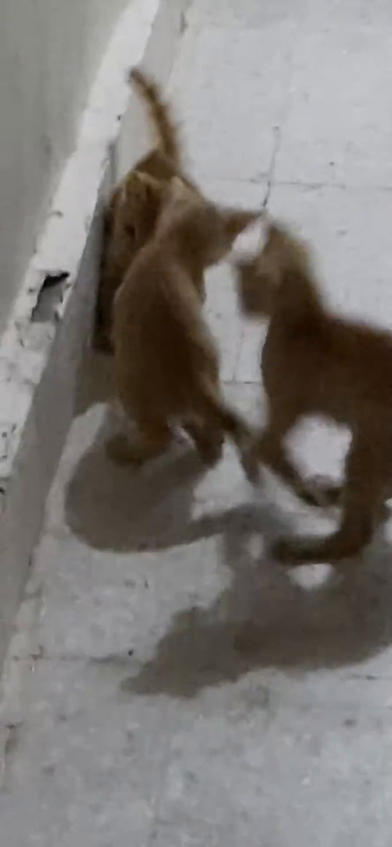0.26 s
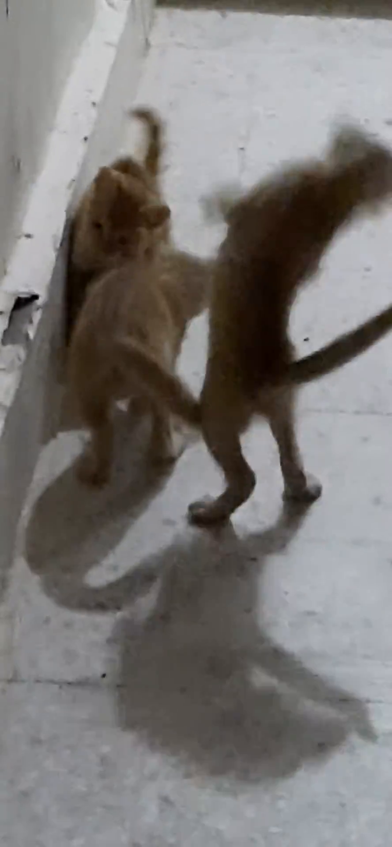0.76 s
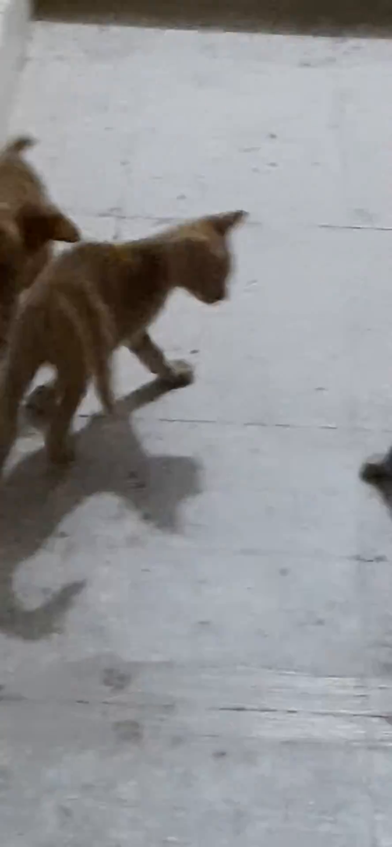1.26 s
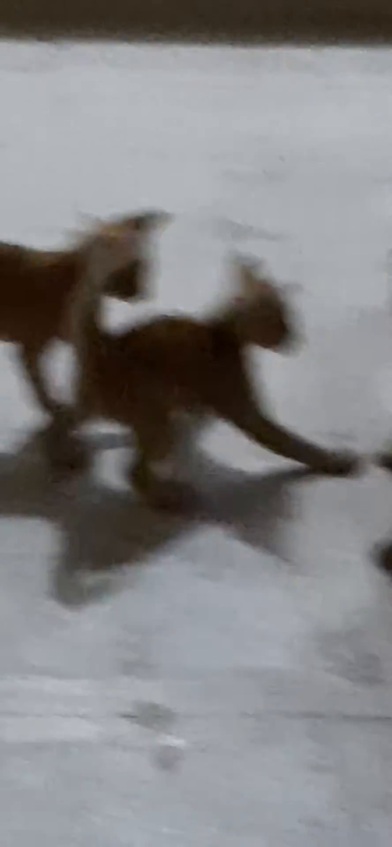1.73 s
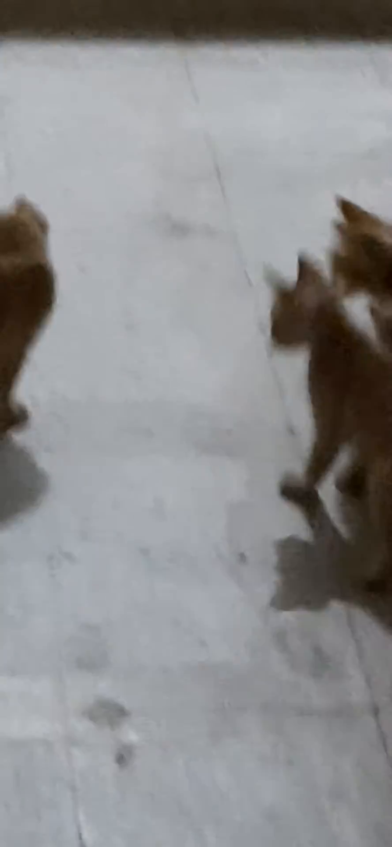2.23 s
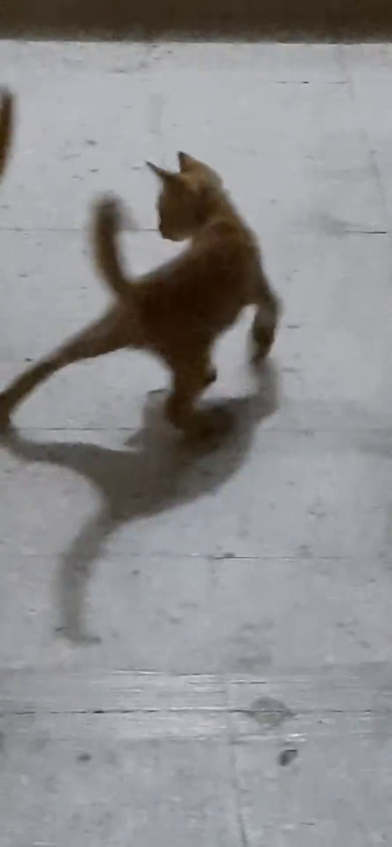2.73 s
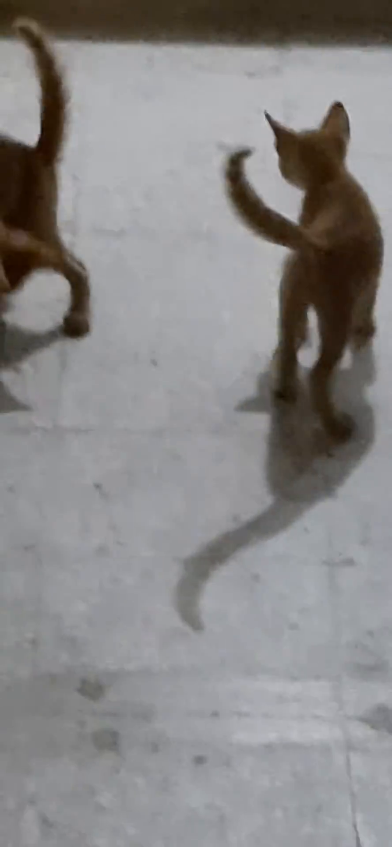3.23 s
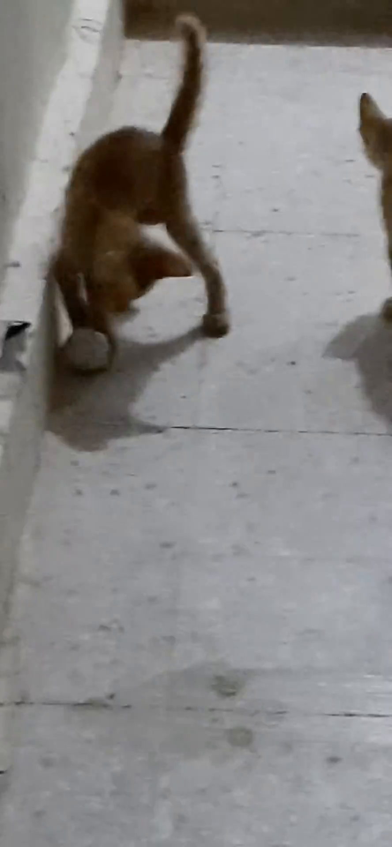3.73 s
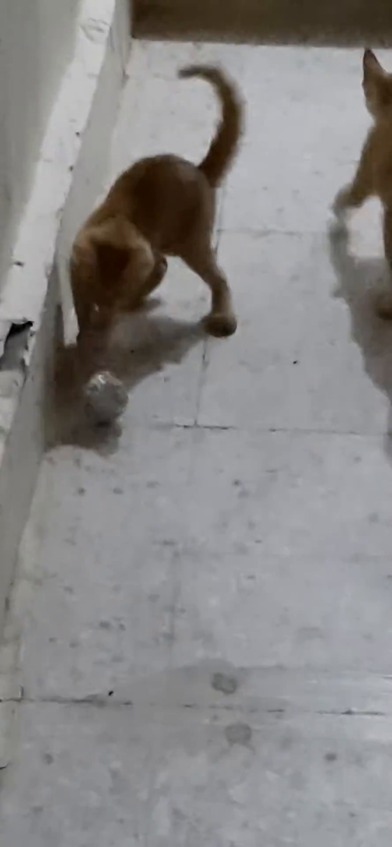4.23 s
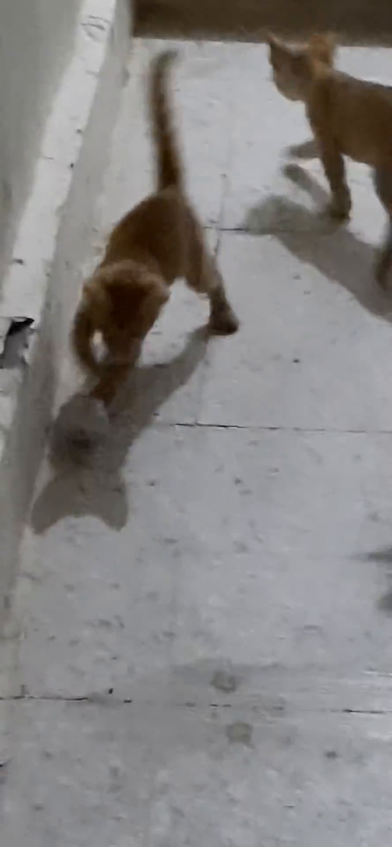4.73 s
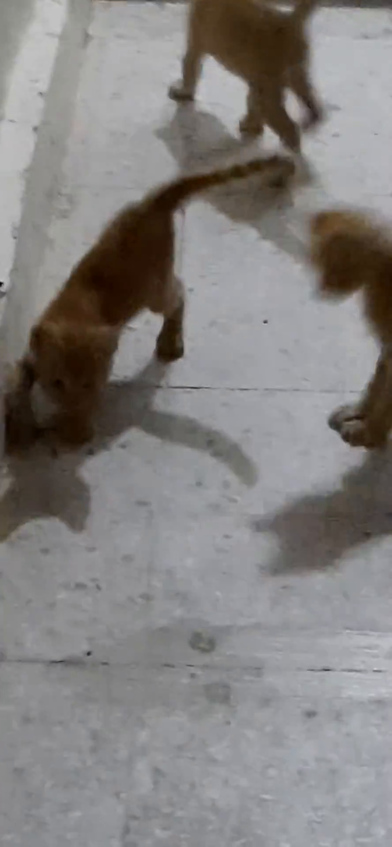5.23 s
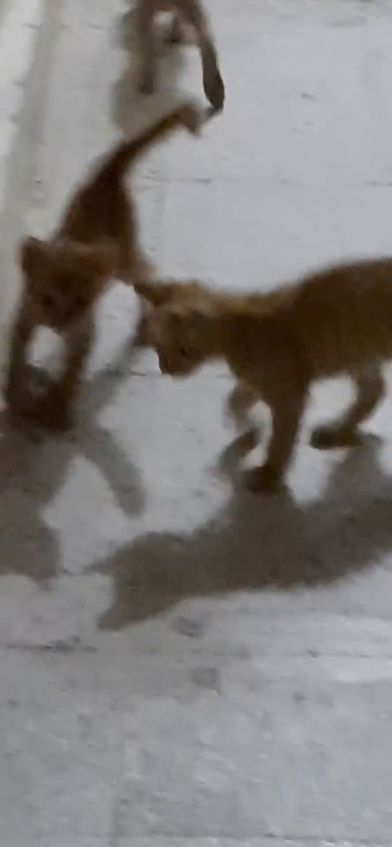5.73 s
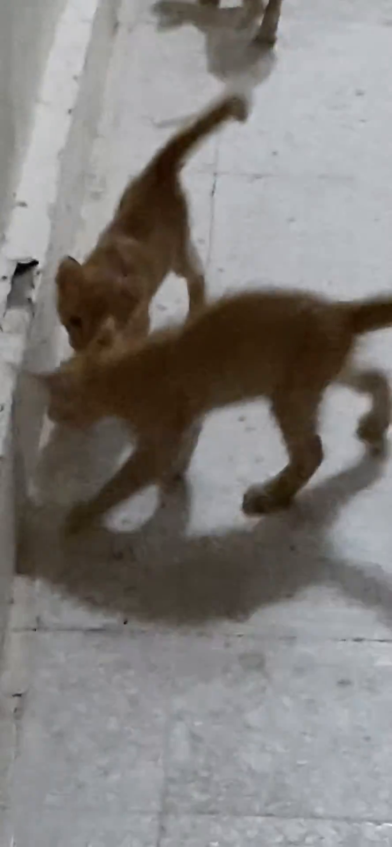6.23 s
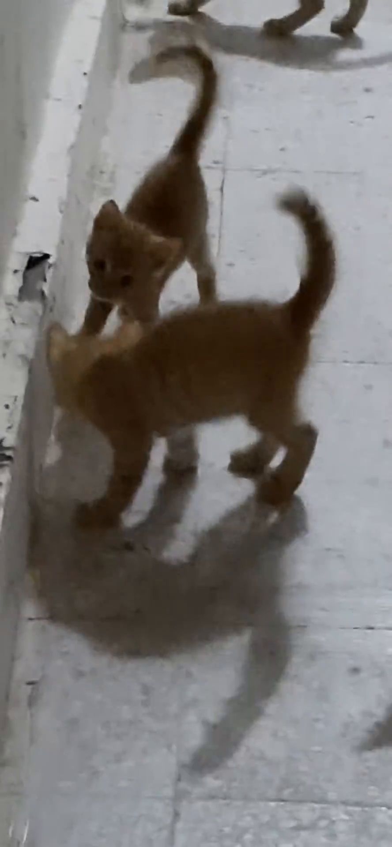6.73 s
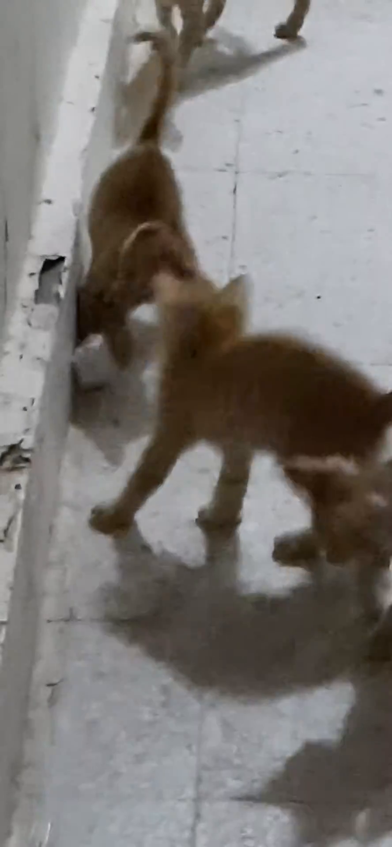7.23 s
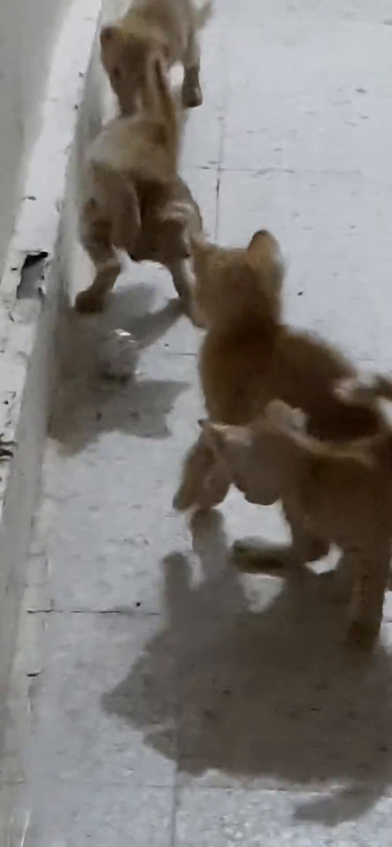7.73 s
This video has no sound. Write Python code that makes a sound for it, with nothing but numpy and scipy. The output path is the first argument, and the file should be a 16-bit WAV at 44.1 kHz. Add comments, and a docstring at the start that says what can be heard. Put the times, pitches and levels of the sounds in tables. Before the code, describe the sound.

Kittens scuffle on a hard tiled floor, claws scratching and a crumpled foil ball ticking and crinkling, over an uneven low hum and airy rush.

```python
"""A low hum throbs unevenly over rumble, drone and a steady rush of air, all shaped from random noise.
Kittens scuffle on a tiled floor: paws and claws skid in grainy strokes of tiny slips and ringing snaps.
A crumpled foil ball ticks, knocks and crinkles along the foot of a wall, built from pushes into resonances.
Smacks, drops and landings ring out as decaying sines; the hard room answers with a short noise tail."""
import sys
import numpy as np
from scipy import signal
from scipy.fft import rfft, irfft, next_fast_len
from scipy.io import wavfile
from scipy.ndimage import map_coordinates

SR = 44100
rng = np.random.default_rng(int(sys.argv[2]) if len(sys.argv) > 2 else 0)


def wav_out(sig):
    """Save sig, one row per channel (or a flat mono array), as 16-bit PCM at SR to the path in sys.argv[1]."""
    wavfile.write(sys.argv[1], SR, np.round(np.clip(np.atleast_2d(sig).T, -1, 1) * 32767).astype(np.int16))


N = 351918  # samples


def amp(db):
    """Decibels to gain."""
    return 10 ** (np.asarray(db) / 20)


def unit(x):
    """x at rms 1."""
    return x / np.sqrt(np.mean(x ** 2) + 1e-20)


def along(points, hz):
    """(f/Hz, value) points read on a log frequency axis."""
    f, value = np.transpose(points)
    return np.interp(np.log(hz + 1), np.log(f + 1), value)


def gains(rows):
    """One gain per sample for each dB column after the time."""
    s, *columns = np.transpose(rows)
    t = np.arange(N) / SR
    return [amp(np.interp(t, s, column)) for column in columns]


def filtered(x, response):
    """x times a response of frequency."""
    n = x.shape[-1]
    padded = next_fast_len(n + 8192)
    spectrum = rfft(x, padded) * response(np.fft.rfftfreq(padded, 1 / SR))
    return irfft(spectrum, padded)[..., :n]


def resonance(hz, centre, width):
    """Causal response of one mode, with gain 1 at its centre."""
    return 1j * hz * width / (centre ** 2 - hz ** 2 + 1j * hz * width)


# left-right likeness of diffuse sound, clipped to -1..1: (f/Hz, correlation)
LIKENESS = [(120, 1.3), (200, 1.16), (380, 0.46), (700, 0.63), (1290, -0.031), (2300, 0.18), (4400, -0.13),
            (10000, .05)]


def spread(pair, spectrum):
    """Two unrelated signals, coloured and mixed to stereo of rms 1: alike in the bass, apart in the treble."""
    def response(hz):
        turn = np.arccos(np.clip(along(LIKENESS, hz), -1, 1)) / 2
        return amp(along(spectrum, hz)) * [np.cos(turn), np.sin(turn)]

    mid, side = filtered(pair, response)
    return unit(np.array([mid + side, mid - side]))


def drifting(n, depth_db, per_s):
    """A smooth random gain of n samples, with per_s random knots a second."""
    knots = np.arange(n) * per_s / SR
    return amp(depth_db * map_coordinates(rng.standard_normal(256), [knots], mode="wrap"))


# uneven swell of the hum, before it is smoothed and given its overall gain: (t/s, level/dB)
HUM_SWELL = [(0.0, -17.5), (0.13, -39.5), (0.15, -25), (0.49, -23.5), (0.56, -39), (0.89, -24.5),
             (1.38, -30.5), (1.44, -23), (1.55, -26.5), (1.6, -43), (1.64, -27), (1.82, -33), (1.86, -23.5),
             (1.91, -41), (1.95, -28), (2.13, -19), (2.45, -29.5), (2.49, -23), (2.89, -25.5),
             (2.91, -34.5), (2.98, -27), (3.11, -38), (3.15, -25), (3.62, -33), (3.65, -26.5), (3.78, -38),
             (3.87, -19), (3.91, -40.5), (3.98, -24.5), (4.16, -35.5), (4.25, -18.5), (4.33, -38),
             (4.44, -23.5), (4.53, -32), (4.58, -21.5), (4.82, -25.5), (4.87, -36), (5.0, -23),
             (5.13, -36.5), (5.31, -26.5), (5.64, -27.5), (5.78, -22.5), (5.84, -38), (5.91, -21),
             (5.96, -50.5), (6.0, -27.5), (6.2, -24.5), (6.27, -32), (6.31, -21.5), (6.47, -27.5),
             (6.49, -37), (6.84, -20.5), (6.93, -29.5), (7.36, -22.5), (7.44, -32), (7.49, -24),
             (7.62, -20.5), (7.67, -28.5), (7.76, -21), (7.98, -30)]
# weak steady tones beside the hum: (f/Hz, level/dB rms at the source)
STEADY_TONES = [(48.8, -53.5), (66, -52), (85, -51), (156, -48.5), (193.5, -53)]
HUM_DB, HUM_STEADY = 1, 0.6  # gain on the swell; evenness of the beating (0 = free, 1 = flat)


def hum():
    """A narrow low resonance, driven at random, throbs by its own beating; faint steady tones lie beside it."""
    mode = lambda hz: resonance(hz, 120.78, 5.33) * resonance(hz, 125.4, 34)
    wave = signal.hilbert(filtered(rng.standard_normal(N), mode))
    beating = np.abs(wave)
    even = unit(wave.real / (HUM_STEADY * beating + (1 - HUM_STEADY) * beating.mean()))
    # a low resonance cannot change its level abruptly
    smooth = lambda hz: np.abs(resonance(hz, 116.7, 53)) ** 2
    throb = filtered(gains(HUM_SWELL)[0] * even, smooth)
    t = np.arange(N) / SR
    tones = 0
    for hz, db in STEADY_TONES:
        tones = tones + amp(db) * np.sqrt(2) * np.sin(2 * np.pi * (hz * t + rng.random()))
    return amp(HUM_DB) * throb + tones


def rush(spectrum):
    """Stereo noise that falls away outside its spectrum."""
    below, above = (spectrum[0][0] / 2, -120), (spectrum[-1][0] * 2, -120)
    return spread(rng.standard_normal((2, N)), [below, *spectrum, above])


# colours of the four background layers, each relative within itself: (f/Hz, level/dB per Hz)
RUMBLE_COLOUR = [(20, -31.5), (30, -26), (45, -4), (60, -2), (75, -14), (95, 9), (112, 6.5), (140, 1.5),
                 (158, 3), (185, -9), (230, -20.5)]
DRONE_COLOUR = [(140, -18.5), (185, -4.5), (215, -3.5), (245, 1), (266, -3.5), (281, 6), (298, -9.5),
                (350, -12), (450, -38.5)]
AIR_COLOUR = [(150, -1.5), (350, 1.5), (440, 4), (530, -1), (620, 0.5), (720, -2.5), (900, 0), (1060, -8.5),
              (1550, -9), (2100, -10.5), (2750, -25), (3300, -24), (4500, -30.5), (7500, -29), (15000, -32)]
WHISTLE_COLOUR = [(1150, -16.5), (1310, -7.5), (1390, 2), (1470, -6.5), (1700, -26.5)]
# slow level changes, before the drift: (t/s, rumble level/dB, drone level/dB, whistling band level/dB)
BACKGROUND_LEVELS = [(0, -35, -43.5, -51), (1.5, -34, -39.5, -55), (2.3, -38, -42.5, -57.5),
                     (3.2, -35.5, -41, -55.5), (4.7, -34.5, -40, -57.5), (6.7, -35.5, -37, -55.5),
                     (7.98, -37.5, -38.5, -55.5)]
AIR_DB = -45.5  # the rush of air, before its drift
WANDER_DB, WANDER_PER_S = 0.9, 4.2  # depth and knot rate of each layer's own drift


def air():
    """Shaped noise: rumble, a hollow drone above the hum, and soft air with one faintly whistling band."""
    rumble, drone, whistle = gains(BACKGROUND_LEVELS)
    layers = [(rumble, RUMBLE_COLOUR), (drone, DRONE_COLOUR),
              (amp(AIR_DB), AIR_COLOUR), (whistle, WHISTLE_COLOUR)]
    return sum(level * drifting(N, WANDER_DB, WANDER_PER_S) * rush(colour) for level, colour in layers)


# colour of paws and foil rubbing on tile, relative: (f/Hz, level/dB per Hz)
FRICTION_COLOUR = [(300, -15), (700, -13.5), (1200, 7.5), (2100, 8), (3000, 0), (4200, -3), (5600, -4.5),
                   (7200, -5), (10000, 0), (15000, -11)]


def grains(n, per_s, scatter_db, life):
    """Tiny slips at random moments, each a short burst; most are weak and a few stand out."""
    size_db = scatter_db * np.minimum(rng.exponential(size=n), 4)
    energy = (rng.random(n) < per_s / SR) * amp(size_db) ** 2
    fading = signal.lfilter([1], [1, -np.exp(-1 / (life * SR))], energy)
    return spread(np.sqrt(fading) * rng.standard_normal((2, n)), [(80, -60), *FRICTION_COLOUR])


def crinkles(n, per_s, life):
    """Creases snap at random moments, each ringing briefly at its own pitch."""
    t = np.arange(SR // 80) / SR
    pair = np.zeros((2, n + len(t)))
    for when, pitch, size, *phases in rng.random((int(n * per_s / SR) + 1, 5)):
        hz = 1700 * 7 ** pitch  # 1.7 to 11.9 kHz before colouring
        turns = hz * t + np.array(phases)[:, None]
        ring = np.sin(2 * np.pi * turns) * np.exp(-t / life)
        pair[:, int(when * n):][:, :len(t)] += np.sqrt(hz) * amp(10 * size) * ring
    return spread(pair[:, :n], [(80, -60), *FRICTION_COLOUR])


RISE_DB, FADE_DB_PER_S, FADE_S = 11, 276.5, .18  # swell into the hold, fade rate, fade length


def stroke(rise, hold):
    """Envelope of one skid: it swells as the paw bears down, holds, and fades as the sliding stops."""
    t = np.arange(round((rise + hold + FADE_S) * SR)) / SR
    swell_db = -RISE_DB * np.maximum(1 - t / rise, 0)
    fade_db = -FADE_DB_PER_S * np.maximum(t - rise - hold, 0)
    return amp(swell_db + fade_db)


JUDDER_DB, JUDDER_PER_S = 2, 160  # depth and knot rate


def judder(n):
    """The quick, uneven gain of a paw that sticks and slips."""
    return unit(drifting(n, JUDDER_DB, JUDDER_PER_S))


# light shuffling between the skids, before a 4 dB lift: (t/s, level/dB)
SHUFFLE_LEVEL = [(0, -67), (.65, -73.5), (1.6, -65.5), (2.45, -71), (2.75, -65), (3.05, -74), (3.6, -65.5),
                 (4.3, -69), (4.9, -62), (5.2, -80), (6.8, -76), (7.05, -63), (7.55, -66.5), (7.76, -60.5),
                 (7.88, -70.5)]
# strokes of paws and foil on the tiles; friction level is before the ring and tilt:
# (start t/s, rise t/s, hold t/s, friction level/dB, ring f/Hz, ring level/dB, tilt/dB per octave)
SKID_STROKES = [(0.116, .006, 0.0036, -54, 2100, 1, 5.5), (0.301, 0.037, .045, -54, 1510, -1, -2),
                (0.384, .008, 0.0033, -52, 4460, 4.5, -1), (0.667, 0.013, 0.0055, -62.5, 6900, 8, 3),
                (1.249, 0.018, .003, -58, 2920, 9.5, -5), (1.324, .006, .012, -57.5, 2900, 6.5, -3),
                (1.416, 0.025, .012, -61.5, 7270, 4, 6), (1.59, .025, .012, -62.5, 4500, 5, -4.5),
                (1.755, .026, 0.043, -46, 2260, 1, -0.5), (1.847, .015, 0.039, -55, 2100, 1, -4.5),
                (2.078, .062, 0.0074, -48.5, 6970, -0.5, 0.5), (2.775, 0.024, .012, -50.5, 2800, 3.5, -2),
                (2.885, .012, .018, -46, 4230, 6.5, 3), (3.12, .012, 0.023, -52, 2070, 11, 3),
                (3.154, 0.04, .05, -49.5, 2170, 8.5, 4.5), (3.261, .005, 0.02, -51.5, 4360, 9, 2.5),
                (3.311, .018, 0.012, -59, 3030, 2, -1.5), (3.724, 0.025, 0.008, -50.5, 2700, 6, -2.5),
                (3.954, 0.027, 0.006, -53.5, 2000, 6, -1.5), (4.024, 0.022, .004, -59.5, 1970, 7, -2),
                (4.167, 0.024, 0.023, -62, 2000, 13, -2.5), (5.417, .004, 0.013, -48.5, 3730, 9, 3.5),
                (5.454, 0.0037, .006, -53.5, 3000, 10.5, -4), (5.613, 0.031, .014, -52, 5030, 2.5, 3.5),
                (7.03, .008, 0.0026, -59.5, 7400, 15, 0.5), (7.407, .008, 0.024, -51, 2520, 6.5, -3),
                (7.463, .03, 0.075, -59, 2200, 2, 3), (7.889, 0.014, 0.085, -50.5, 4500, 1, -1.5)]


def skids():
    """Claws and foil catch in dense slips and ringing snaps, each stroke with its own ring; faint shuffling."""
    out = amp(4.0) * gains(SHUFFLE_LEVEL)[0] * grains(N, per_s=900, scatter_db=3, life=0.0028)
    for s, rise, hold, db, ring_hz, ring_db, tilt_db in SKID_STROKES:
        first = round(s * SR)
        pressure = stroke(rise, hold)[:N - first]
        n = len(pressure)
        ring = lambda hz: 1 + (amp(ring_db) - 1) * resonance(hz, ring_hz, 0.18 * ring_hz)
        tilt = lambda hz: amp(tilt_db * np.log2((hz + 500) / 5000))
        slips = grains(n, per_s=1400, scatter_db=1.9, life=0.0009)
        snaps = amp(-6) * crinkles(n, per_s=800, life=.0012)
        scrape = filtered(slips + snaps, lambda hz: ring(hz) * tilt(hz))
        out[:, first:first + n] += amp(db) * pressure * judder(n) * scrape
    return out


# decay of the room's answer: (f/Hz, t60/s)
WALL_DECAY = [(200, 0.19), (2000, 0.079), (7000, 0.13), (15000, 0.19)]


def walls(x):
    """Bare walls and tiles answer with a short noise tail, 5 ms late, decaying at its own rate per frequency."""
    hz, t, z = signal.stft(rng.standard_normal((2, SR // 2)), SR, nperseg=256)
    decay = amp(-60 * t / along(WALL_DECAY, hz)[:, None])
    tail = signal.istft(z * decay, SR, nperseg=256)[1]
    tail = np.pad(tail / np.linalg.norm(tail[0]), ((0, 0), (SR // 200, 0)))
    return signal.fftconvolve(x, tail, axes=1)[:, :N]


# brief narrow noises, mostly rubs of ball or paw; the low one at 0.39 s is a faint tone of unknown source.
# Level is before the swell: (middle t/s, length t/s, f/Hz, width f/Hz, level/dB)
NARROW_NOISES = [(0.39, .13, 424, 119, -45), (1.78, .025, 2100, 380, -47), (1.805, 0.023, 2200, 450, -43.5),
                 (1.79, .03, 4200, 500, -52.5), (2.913, 0.046, 4240, 600, -51.5),
                 (3.281, .05, 2700, 700, -52.5), (6.915, 0.052, 1780, 300, -50.5),
                 (7.171, 0.047, 1820, 380, -44.5)]


def narrow_noises():
    """Brief noises, mostly rubs of ball or paw, swell and fade, each in one narrow resonance."""
    out = np.zeros((2, N))
    for s, length, ring_hz, width_hz, db in NARROW_NOISES:
        swell = np.hanning(round(length * SR))
        mode = lambda hz: resonance(hz, ring_hz, width_hz) ** 2
        noise = filtered(rng.standard_normal(len(swell)), mode)
        out[:, round((s - length / 2) * SR):][:, :len(swell)] += amp(db) * swell * unit(noise)
    return out


def burst(t, t60):
    """Noise of one contact dying away, mostly shared by left and right."""
    noise = rng.standard_normal(len(t)) + .5 * rng.standard_normal((2, len(t)))
    return noise * amp(-60 * t / t60)


# claws click sharply on the tile: (t/s, level/dB rms over a sixteenth of a second)
CLAW_CLICKS = [(0.393, -59), (1.268, -62), (1.635, -70.5), (1.78, -57.5), (2.147, -62.5), (4.641, -61),
               (4.722, -70), (4.902, -69.5), (5.419, -61.5), (5.425, -61.5), (5.435, -62), (7.174, -65.5),
               (7.431, -60.5), (7.909, -64.5)]
CLICK_HZ, CLICK_WIDTH_HZ, CLICK_T60_S = 8000, 19000, 0.011


def clicks():
    """A claw tip strikes the hard floor: a very short, bright crack with no body."""
    t = np.arange(SR // 16) / SR
    out = np.zeros((2, N))
    bright = lambda hz: resonance(hz, CLICK_HZ, CLICK_WIDTH_HZ) ** 2
    for s, db in CLAW_CLICKS:
        crack = filtered(burst(t, t60=CLICK_T60_S), bright)
        out[:, round(s * SR):][:, :len(t)] += amp(db) * unit(crack)
    return out


def strike(t, rattle_db, t60):
    """One sharp push together with a brief rattle of the foil's creases."""
    rattle = burst(t, t60)
    return (t == 0) + amp(rattle_db) * rattle / np.linalg.norm(rattle[0])


# the crumpled ball's hollow resonances, before each contact's pitch factor: (f/Hz, width f/Hz, level/dB)
BALL_MODES = [(1740, 380, 6), (2280, 460, 1.5), (3650, 470, -10)]
# contacts of the ball and of claws, levels before the trims in taps():
# (t/s, floor knock f/Hz, knock level/dB, ball pitch factor, hollow body level/dB, crack level/dB)
CONTACTS = [(1.156, 513, -49, 0.9, -44.5, -56.5), (1.334, 510, -45.5, 0.84, -50.5, -57.5),
            (1.792, 704, -48, 1, -45, -55.5), (1.8, 527, -45, 0.95, -44.5, -49.5),
            (1.813, 700, -48.5, 1.2, -49.5, -52.5), (1.828, 780, -44, 1.1, -50.5, -53.5),
            (1.836, 700, -47.5, 0.77, -51, -58.5), (2.373, 830, -54.5, 0.77, -53.5, -66),
            (2.656, 875, -52.5, 0.97, -46, -66.5), (3.214, 1310, -49, 1.1, -48, -64.5),
            (3.247, 1300, -64, 0.97, -43, -62.5), (3.265, 1300, -63, 1.2, -46.5, -59),
            (3.383, 1320, -49.5, 1.0, -48.5, -54.5), (3.404, 530, -39.5, 0.95, -39.5, -52),
            (3.982, 880, -44, 1, -48, -56.5), (4.056, 900, -53, 1.17, -51.5, -62),
            (4.393, 783, -43, 1.03, -43.5, -69), (4.578, 854, -50, 0.76, -50, -69),
            (4.641, 920, -43.5, 0.87, -38.5, -62), (4.723, 820, -44, 0.98, -42, -57),
            (4.7565, 864, -51, 0.9, -44, -60.5), (7.172, 1300, -55.5, 0.96, -55, -53),
            (7.208, 1300, -53.5, 1.2, -52.5, -53.5), (7.2433, 1080, -44.5, 0.99, -45, -49.5),
            (7.252, 1060, -57, 1.1, -47, -58.5), (7.409, 1150, -48, 1.07, -40, -54),
            (7.42, 1100, -60, 1.3, -48.5, -55.5), (7.431, 1050, -43.5, 1.1, -44, -52.5),
            (7.508, 1300, -50, 1.1, -53, -59.5), (7.543, 1300, -51, 1, -47.5, -56.5),
            (7.899, 1290, -52.5, 0.95, -48.5, -59), (7.96, 1300, -54, 0.91, -48, -56)]


def taps():
    """Each contact knocks on the floor, cracks the foil and rings the hollow ball at its own pitch."""
    t = np.arange(SR // 8) / SR
    out = np.zeros((2, N + len(t)))

    def hollow(hz):
        # neighbouring modes ring in opposite phase
        return sum((-1) ** k * amp(db) * resonance(hz, centre, width)
                   for k, (centre, width, db) in enumerate(BALL_MODES))

    for s, knock_hz, knock_db, pitch, body_db, crack_db in CONTACTS:
        floor = lambda hz: resonance(hz, knock_hz, 0.5 * knock_hz) ** 2
        ball = lambda hz: hollow(hz / pitch) * resonance(hz, 2100, 1800)
        foil = lambda hz: resonance(hz, 5500, 10000) ** 2
        knock = filtered(strike(t, rattle_db=1, t60=0.028), floor)
        body = filtered(strike(t, rattle_db=-1.5, t60=0.029), ball)
        crack = filtered(strike(t, rattle_db=3.0, t60=0.03), foil)
        contact = amp(knock_db - 10.5) * unit(knock)
        contact = contact + amp(body_db - 16.0) * unit(body)
        contact = contact + amp(crack_db - 14) * unit(crack)
        out[:, round(s * SR):][:, :len(t)] += contact
    return out[:, :N]


CONTACT_S = 0.00049  # time constant of a ring's build-up


def rings(hits, modes):
    """Clean, hard contacts: a few modes ring out, left and right slightly out of step."""
    t = np.arange(SR // 8) / SR
    out = np.zeros((2, N + len(t)))
    for s, db, pitch in hits:
        for hz, mode_db, t60 in modes:
            phase = rng.normal(0, 0.44) * np.array([[1], [-1]])
            wave = np.sin(2 * np.pi * hz * pitch * t + phase)
            envelope = amp(db + mode_db - 60 * t / t60) * (1 - np.exp(-t / CONTACT_S))
            out[:, round(s * SR):][:, :len(t)] += envelope * wave
    return out[:, :N]


# a leaping kitten lands, level before mode gain and build-up: (t/s, level/dB, pitch factor)
KITTEN_LANDINGS = [(1.8001, -25, 1), (1.8275, -34, 1.5)]
# modes of the thudding floor, before the pitch factor: (f/Hz, level/dB, t60/s)
THUD_MODES = [(540, 2.5, 0.018), (900, -11, .012)]


def landings():
    """A kitten's weight drops on the floor, which thuds in two quickly damped modes."""
    return rings(KITTEN_LANDINGS, THUD_MODES)


# the ball is batted hard against the wall, level before mode gain and build-up: (t/s, level/dB, pitch factor)
WALL_SMACKS = [(5.4199, -29.5, 1.03), (5.4245, -35.5, 1.08), (5.4474, -21.5, 1.03), (5.4551, -23.5, 0.97)]
# modes of the foil shell, before the pitch factor: (f/Hz, level/dB, t60/s)
SHELL_MODES = [(1820, 1.5, 0.011), (2300, -3, 0.011), (3580, -12, 0.012)]


def smacks():
    """The ball hits the wall and its foil shell rings for a few milliseconds."""
    return rings(WALL_SMACKS, SHELL_MODES)


# the ball drops back on the tile, level before mode gain and build-up: (t/s, level/dB, pitch factor)
BALL_DROPS = [(7.2435, -30.5, 1), (7.4095, -43, 0.83)]
# modes of the tile, before the pitch factor: (f/Hz, level/dB, t60/s)
TILE_MODES = [(957, -2, .07), (1134, -0.5, 0.064), (1770, -8, .04)]


def drops():
    """The falling ball makes the tile under it ring dully."""
    return rings(BALL_DROPS, TILE_MODES)


# where the play goes on: (t/s, left minus right level/dB)
PLAY_PLACE = [(0, 0.5), (1.8, 0.5), (2.15, -0.5), (2.8, -2.5), (2.92, -5), (3.18, -1), (3.8, -1),
              (4.7, 1.5), (5.43, -4.5), (5.66, -7.5), (7.05, -1), (7.98, -1.5)]
SLIDE_ROOM_DB, TAP_ROOM_DB, RING_ROOM_DB = -3, -1, -7  # send of each kind of sound to the walls


def scene():
    """The play moves left and right and echoes, over the hum and the air."""
    sides = gains(PLAY_PLACE)[0] ** np.array([[.5], [-.5]])
    sustained = sides * (skids() + narrow_noises())
    tapping = sides * (taps() + clicks())
    ringing = sides * (smacks() + drops() + landings())
    echo = walls(amp(SLIDE_ROOM_DB) * sustained + amp(TAP_ROOM_DB) * tapping + amp(RING_ROOM_DB) * ringing)
    return sustained + tapping + ringing + echo + hum() + air()


# dip in the treble of the whole sound: (f/Hz, level/dB)
TREBLE_DIP = [(7400, 0), (7900, -12.5), (8400, -24), (9500, -21), (12000, -12), (15500, -7)]
# how much louder the left side is: (f/Hz, level/dB)
LEFT_LEAN = [(60, 1), (200, 3.5), (330, -1.5), (700, 4.5), (1300, 1), (2400, 0), (4400, 5.5), (15000, 4)]
TOP_HZ = 15750  # band limit


def record(dry):
    """Left and right of slightly unlike colour, a dip in the treble and a band limit."""
    def colour(hz):
        lean_db = np.outer([.5, -.5], along(LEFT_LEAN, hz))
        return amp(along(TREBLE_DIP, hz) + lean_db)

    return filtered(dry, lambda hz: colour(hz) * (hz < TOP_HZ))


dry = scene()
out = record(dry)
wav_out(out)
```